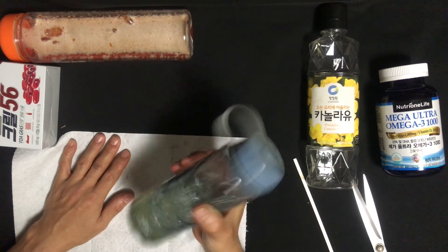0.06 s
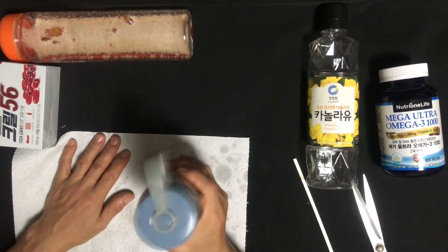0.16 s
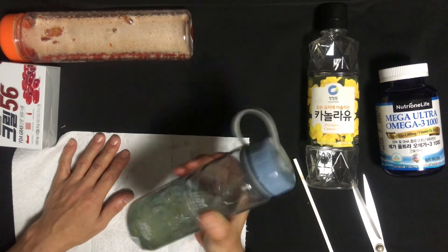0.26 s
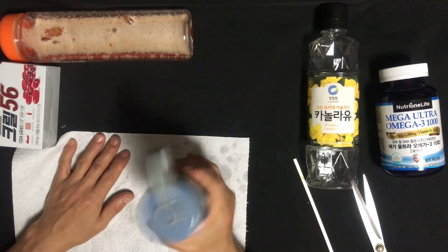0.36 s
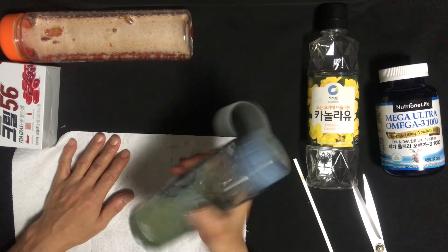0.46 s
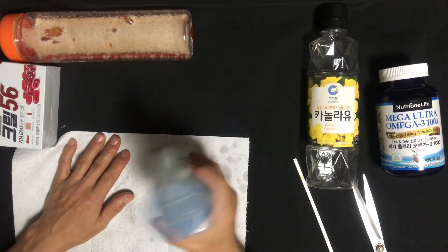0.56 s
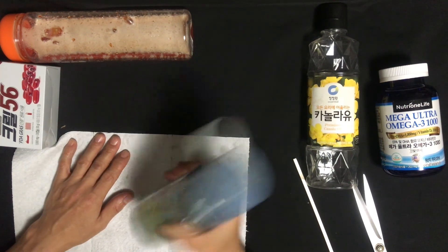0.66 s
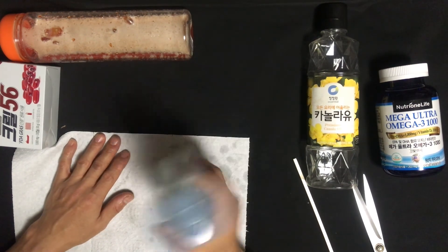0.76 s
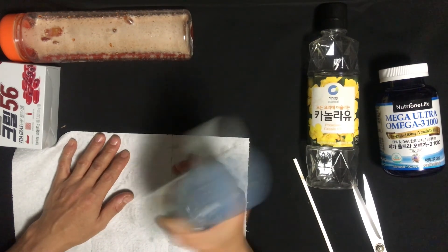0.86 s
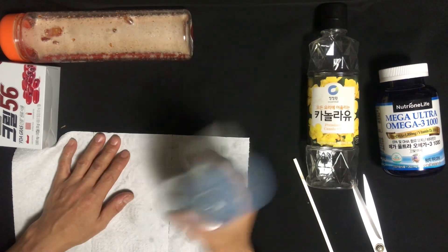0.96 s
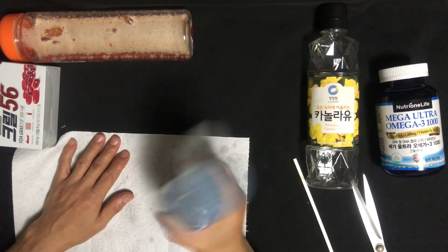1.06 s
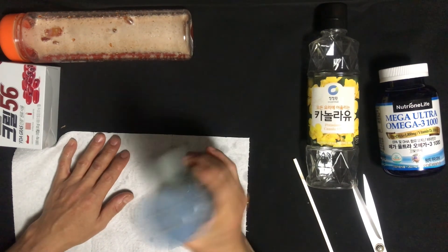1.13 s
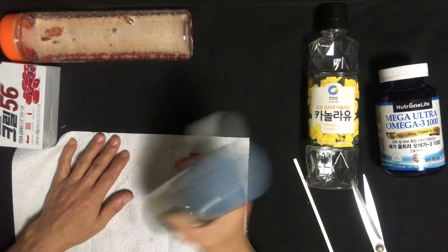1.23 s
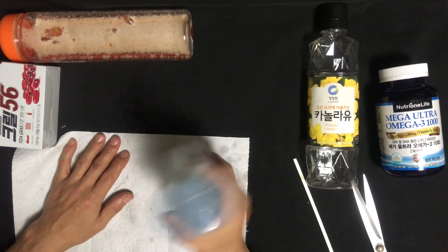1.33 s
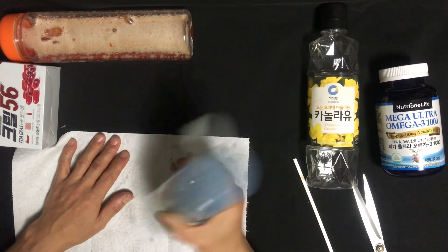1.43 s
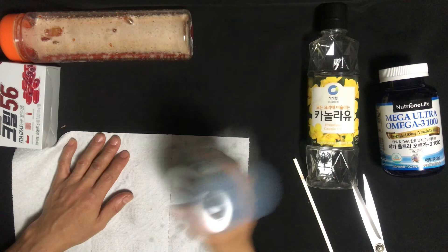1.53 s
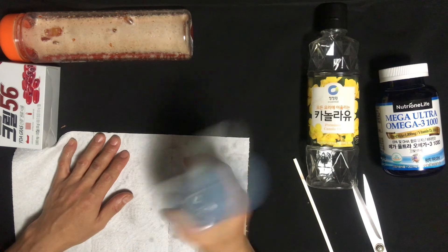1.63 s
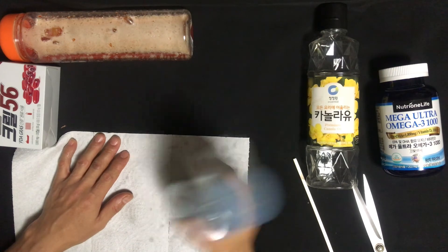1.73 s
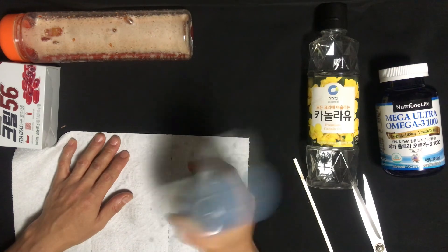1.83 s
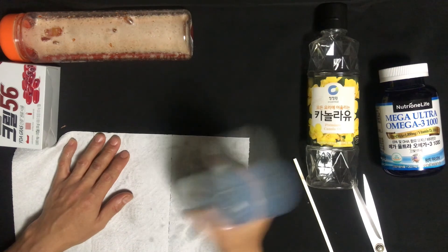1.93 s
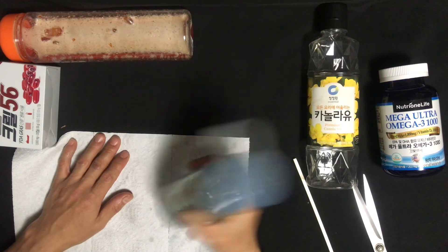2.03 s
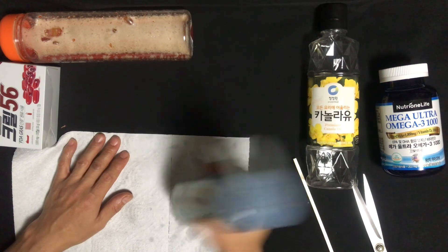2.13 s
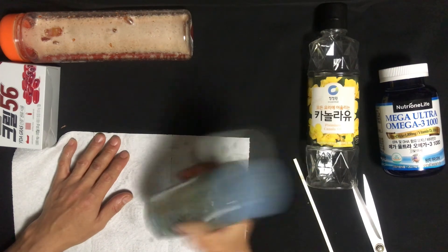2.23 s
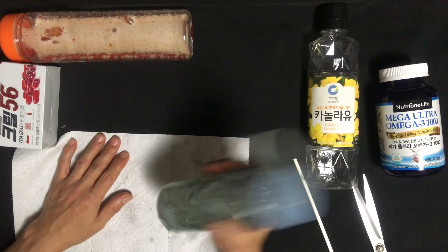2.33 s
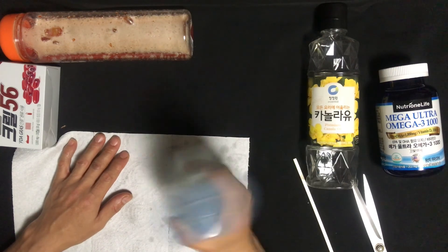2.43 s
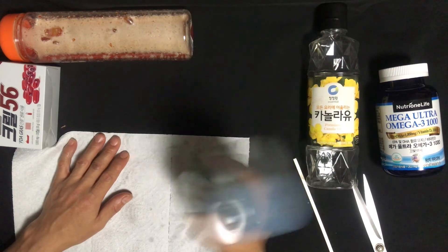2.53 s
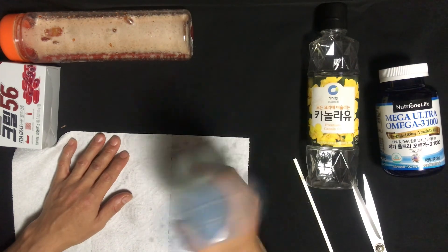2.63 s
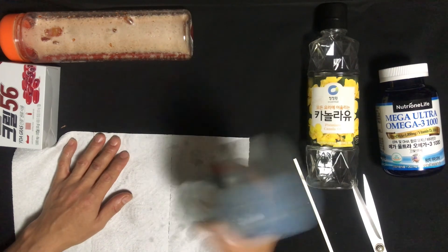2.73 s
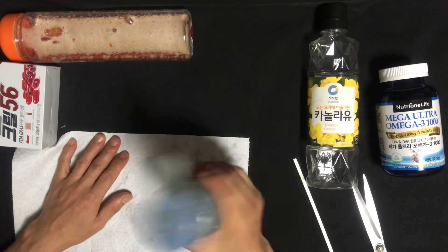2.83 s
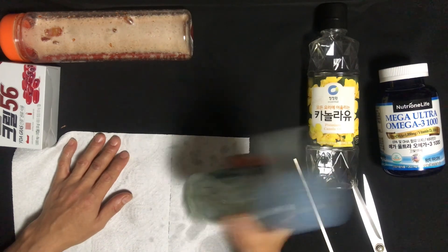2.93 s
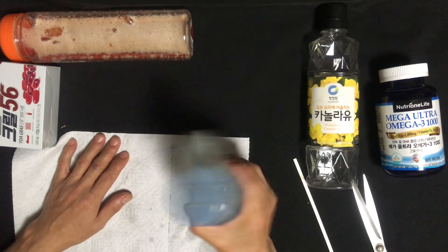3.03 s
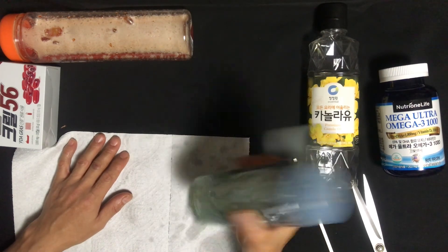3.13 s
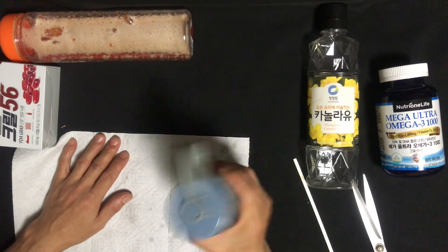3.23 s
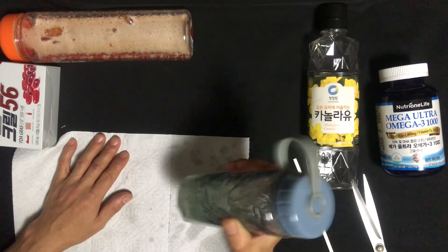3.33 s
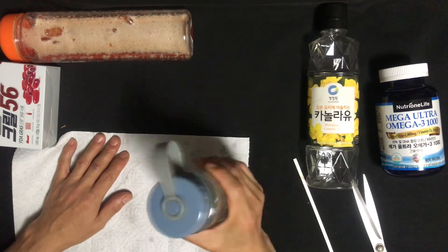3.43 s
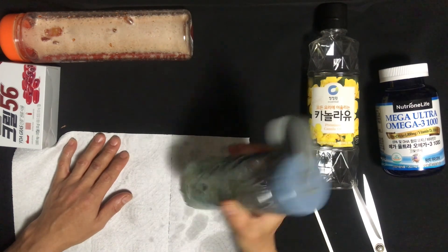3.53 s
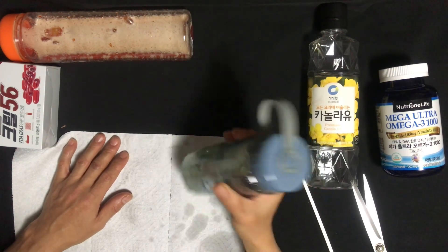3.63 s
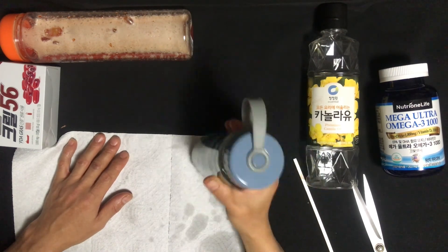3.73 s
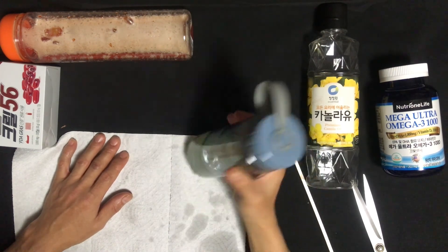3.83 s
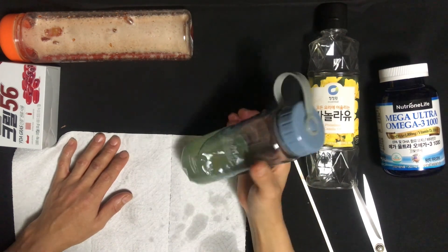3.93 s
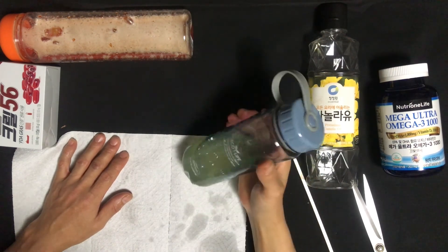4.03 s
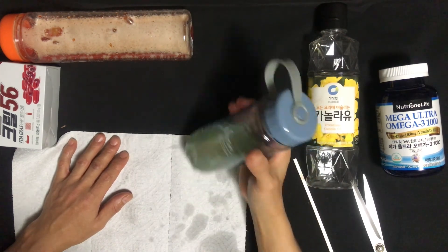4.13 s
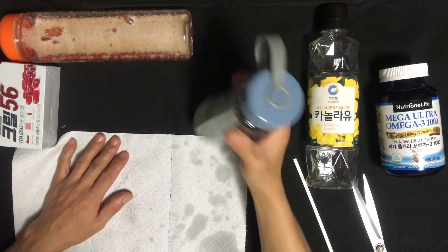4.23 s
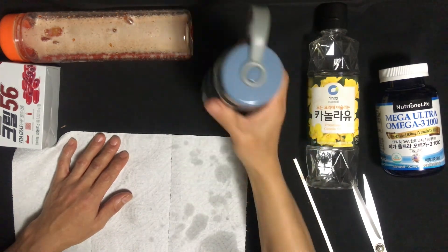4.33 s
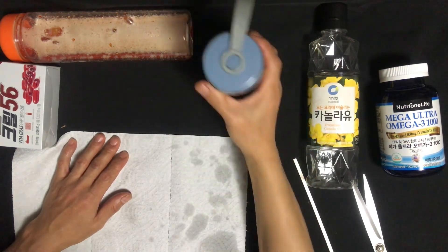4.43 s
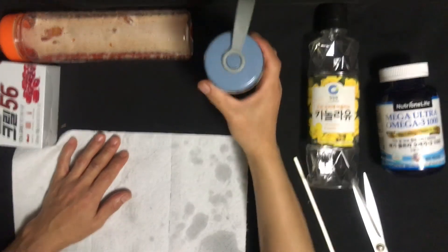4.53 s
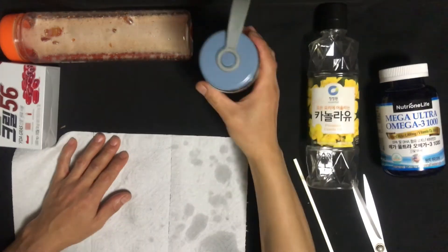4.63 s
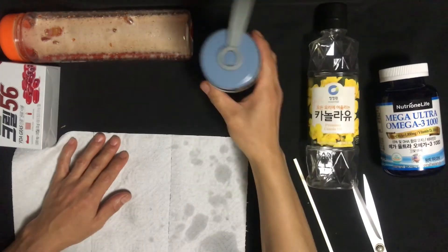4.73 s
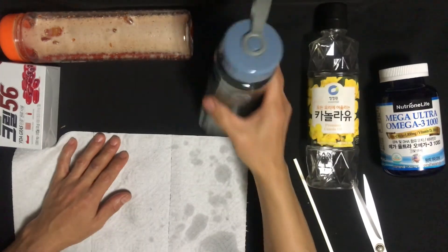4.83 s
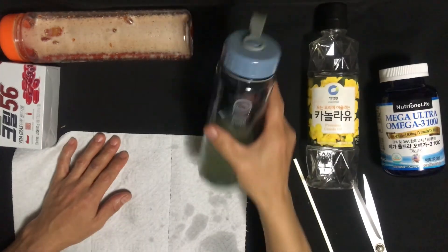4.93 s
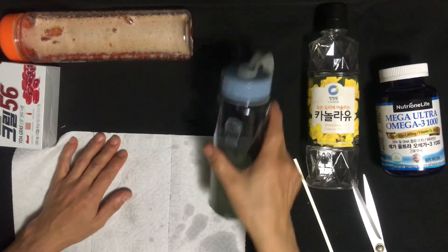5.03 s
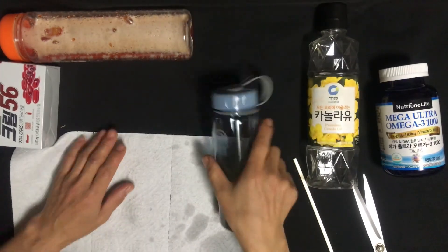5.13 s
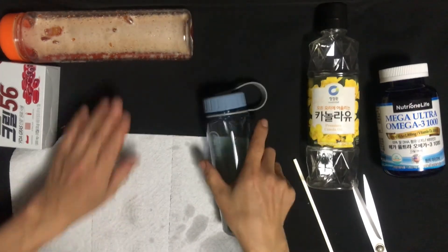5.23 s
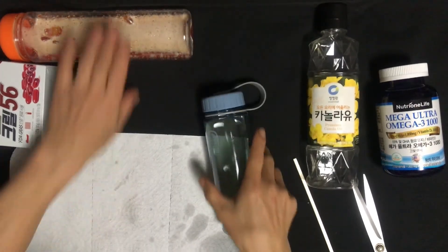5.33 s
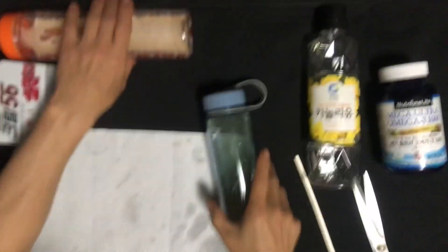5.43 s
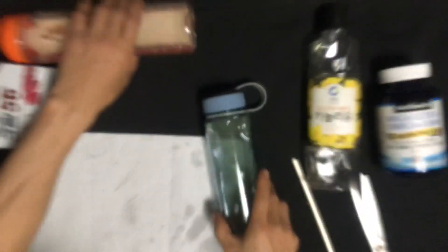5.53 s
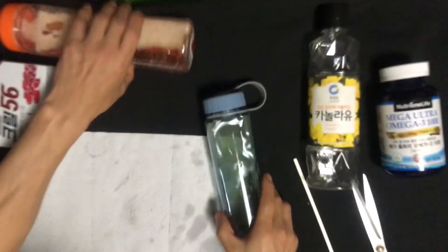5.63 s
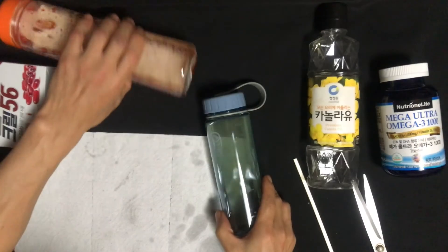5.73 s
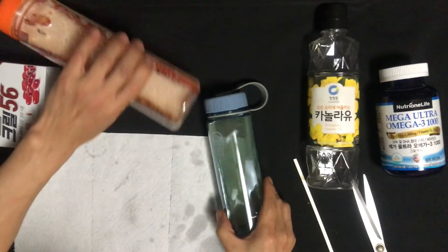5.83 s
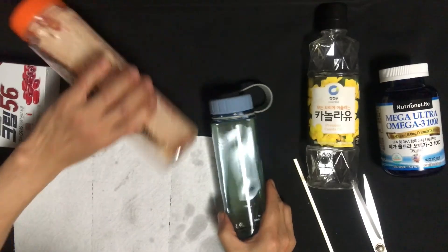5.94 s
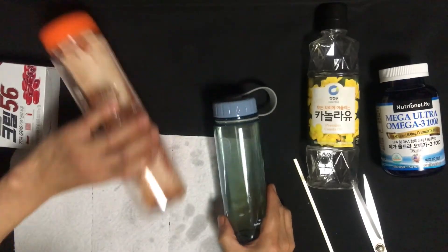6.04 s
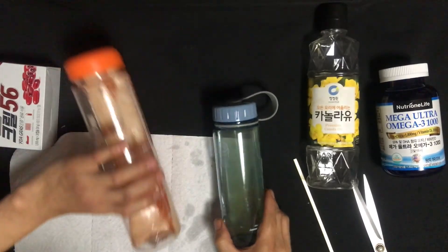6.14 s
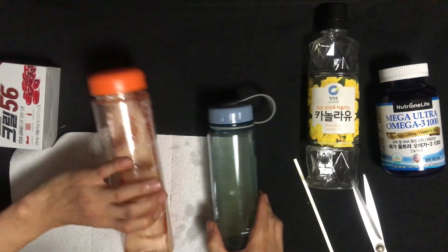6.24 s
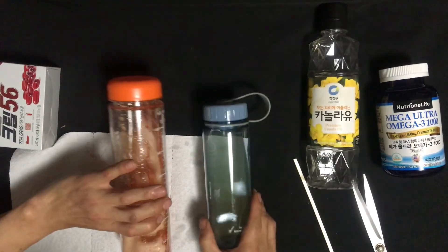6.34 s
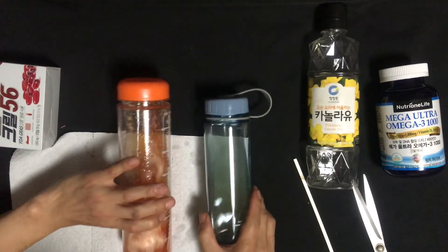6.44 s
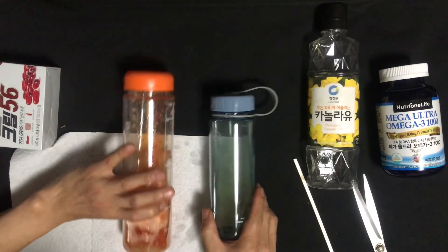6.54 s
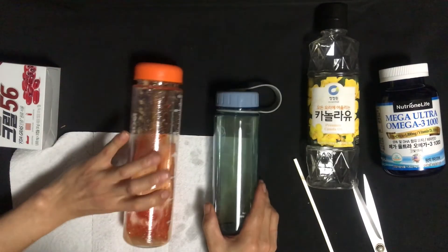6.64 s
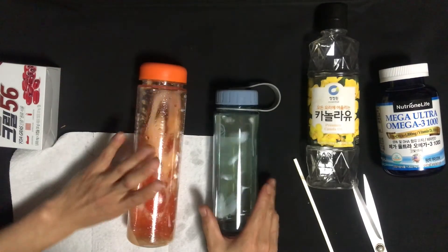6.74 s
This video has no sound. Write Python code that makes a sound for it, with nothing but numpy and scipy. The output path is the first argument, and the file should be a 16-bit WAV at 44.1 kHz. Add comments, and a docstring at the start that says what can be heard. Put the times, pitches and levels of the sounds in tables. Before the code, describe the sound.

Vigorous wet sloshing and bubbling inside a plastic bottle stops after several seconds, followed by padded set-down thumps, a plastic knock and quiet rubbing.

```python
"""Small quiet room, cloth-covered table, mostly direct sound: a plastic bottle part filled with oily liquid.
First it is shaken hard: random ringing bubbles churn, and slugs strike the damped modes of the wall.
The shaking stops and single drips follow, each a tick on the wall with one ringing bubble.
Then padded thumps as the bottle is set down, taps of its lid and knocks on a second bottle.
Slides of hands and plastic are swelling coloured noise; a steady noise is the room tone throughout."""
import sys
import numpy as np
from scipy import signal
from scipy.fft import rfft, irfft
from scipy.io import wavfile
from scipy.ndimage import uniform_filter1d, map_coordinates

SR = 44100
rng = np.random.default_rng(int(sys.argv[2]) if len(sys.argv) > 2 else 0)


def pcm_store(signal):
    """Save signal as 16-bit PCM."""
    levels = np.round(np.clip(np.atleast_2d(signal), -1, 1) * 32767)
    wavfile.write(sys.argv[1], SR, levels.astype(np.int16).T)


N = 298998

# strokes throwing the liquid to and fro: start_s, foam_hold_s, large_bubbles_db, small_bubbles_db (relative)
STROKES = [(-.04, 0.014, -48, -45.5), (0.047, 0.019, -53.5, -41.5), (0.218, 0.051, -46.5, -42),
           (.321, 0.052, -58, -45.5), (0.415, 0.069, -47.5, -42), (0.528, 0.16, -44.5, -41.5),
           (0.742, 0.069, -46, -43.5), (0.938, 0.12, -46, -42), (1.16, 0.088, -45, -42.5),
           (1.328, 0.13, -47.5, -43.5), (1.494, 0.28, -45.5, -42.5), (1.707, 0.055, -46, -47),
           (1.778, 0.057, -46.5, -40.5), (1.956, 0.056, -45, -39.5), (2.152, 0.048, -48.5, -37),
           (2.303, 0.38, -45.5, -44.5), (2.521, 0.048, -42, -38), (2.716, 0.066, -41.5, -39),
           (2.894, 0.11, -43.5, -39), (3.088, 0.18, -42, -41.5), (3.278, 0.14, -43, -43.5),
           (3.475, 0.073, -52, -47)]
# flung drops landing between strokes: start_s, first_tick_peak_db, patter_db, foam_db (last two relative)
FLINGS = [(0.1116, -41, -61, -49.5), (.405, -27.5, -69, -48.5), (0.561, -37, -49, -59),
          (0.751, -35, -50.5, -48.5), (0.847, -60, -80, -40.5), (.897, -36, -50, -68),
          (1.031, -52, -54, -42), (1.105, -46, -48.5, -46), (1.182, -37, -61, -60),
          (1.3353, -28.5, -63, -54), (1.466, -34.5, -56, -55), (1.6714, -20, -46, -49),
          (1.8648, -27, -45.5, -49), (1.897, -43, -49, -38), (2.084, -25.5, -52.5, -46),
          (2.11, -50, -54, -42), (2.2659, -18.5, -43.5, -46.5), (2.454, -33, -46, -40),
          (2.656, -27.5, -47.5, -43), (2.6935, -32, -55, -42), (2.842, -31, -47, -41),
          (2.882, -50, -50, -42.5), (3.0553, -22.5, -44.5, -37.5), (3.2292, -26, -47.5, -63)]
# hardest slugs of liquid, each trapping a bubble; levels before the trims in splat:
# start_s, slap_level_db, slap_tilt_db_per_octave, bubble_pitch_hz, bubble_level_db, bubble_ring_cycles
SLAPS = [(0.0628, -19.5, 2.5, 1250, -21, 18), (0.0882, -20, -3, 3240, -24, 36),
         (0.2113, -27, 4.5, 2620, -24, 17), (0.2569, -23, -3, 1070, -52, 31),
         (0.3233, -22.5, -2, 2040, -21.5, 11), (.4255, -22, -4, 1300, -42.5, 22),
         (0.448, -12.5, -4, 1070, -14.5, 16), (0.473, -12.5, -0.5, 1030, -13.5, 11),
         (0.614, -28, 5, 2390, -21.5, 29), (0.7535, -24, 5, 1073, -22, 23),
         (0.9595, -20, 4, 1840, -26.5, 41), (1.202, -17, 2.5, 1170, -35, 25),
         (1.289, -20.5, 2, 895, -30.5, 38), (1.3363, -22.5, 1, 980, -48, 26),
         (1.365, -35, 13, 4830, -26, 47), (1.389, -25.5, 0, 2190, -24, 28), (1.6259, -25, 7, 3750, -22, 22),
         (1.631, -26, 1.5, 1860, -24, 32), (1.7648, -23, 4, 3700, -21, 18),
         (1.797, -36, 6, 1007, -17.5, 30), (1.9953, -17.5, 2.5, 980, -13, 37),
         (2.06, -18.5, 2.5, 4270, -21, 37), (2.152, -17.5, -4, 1054, -23, 41),
         (2.168, -15, -11, 1000, -24.5, 30), (2.3222, -21.5, 3, 1292, -18, 35),
         (2.362, -20.5, -1.5, 1190, -34, 27), (2.405, -19.5, 1, 2280, -39, 38),
         (2.4627, -29.5, 17, 4630, -20, 36), (2.5765, -24.5, -5.5, 2080, -15.5, 15),
         (2.736, -18, -1.5, 890, -26.5, 31), (2.8402, -14, -1.5, 1680, -24.5, 13),
         (2.885, -33, -2, 2480, -23, 24), (2.9109, -14, -0.5, 1550, -25, 18),
         (2.915, -12, -2.5, 1110, -18.5, 25), (2.9384, -19, -5, 1050, -25, 23),
         (2.9807, -25, -8, 2010, -21.5, 23), (3.0555, -14, -0.5, 1345, -23, 39),
         (3.1499, -12, -2, 1090, -37, 27), (3.169, -21.5, 1, 1040, -13.5, 11),
         (3.188, -15.5, -0.5, 940, -18, 7.9), (3.2211, -20.5, -5, 1190, -43, 27),
         (3.2958, -13.5, 0.5, 1204, -20, 61), (3.4412, -21.5, -0.5, 3120, -20, 19),
         (3.5098, -23, 4, 2820, -41, 20), (3.587, -12.5, -3, 1570, -36, 28)]
# hollow gulps of the squeezed air pocket: start_s, peak_db, pitch_hz
GULPS = [(.063, -41.5, 698), (.426, -38, 704), (.755, -40.5, 730), (1.3363, -35, 705), (1.972, -39, 630),
         (2.324, -35, 712), (2.363, -32, 708), (2.735, -31.5, 718), (2.753, -33, 627), (2.917, -35.5, 645),
         (2.939, -35, 687), (3.133, -33, 693), (3.297, -29.5, 724)]
# drips as the liquid drains back; levels before the trims in splat:
# start_s, tick_level_db, bubble_pitch_hz, bubble_level_db
DRIPS = [(3.657, -61, 2290, -48), (3.678, -68, 4280, -52), (3.708, -59, 1690, -50), (3.754, -40, 2730, -56),
         (3.767, -42, 3540, -45), (3.774, -39.5, 3400, -47), (3.781, -46, 4400, -43),
         (3.791, -42, 7040, -42), (3.799, -46, 4000, -38.5), (3.814, -51, 4200, -45),
         (3.873, -45.5, 824, -47.5), (3.889, -45, 1420, -41), (3.911, -51, 3900, -49),
         (3.941, -70, 1370, -46.5), (4.085, -51, 870, -54), (4.172, -64, 960, -48.5)]
# bottle wall modes, damped by the liquid: pitch_hz, level_db, t60_s
WALL_MODES = [(691, -14.5, 0.011), (1016, -2, 0.004), (1595, -1, 0.0051), (2100, 3, 0.0042),
              (2477, 4, 0.0031), (3154, -1, 0.0047), (3524, -8.5, 0.0076), (4213, -4, 0.0031),
              (5750, -18.5, 0.0084), (6530, -20.5, 0.0097), (8910, -22, 0.0053), (11740, -22, 0.0026)]
# how strongly bubbles of each pitch come through the wall: pitch_hz, level_db
LARGE_BUBBLES = [(400, -16.5), (540, -11), (620, -5), (705, -0.5), (800, -0.5), (980, 3.5), (1200, 0.5),
                 (1400, 4.5)]
SMALL_BUBBLES = [(1400, -5), (2000, -0.5), (2600, 3), (3400, 0), (4400, 2), (5100, -7), (6000, 1.5)]
SPRAY_BUBBLES = [(6200, 8), (7600, -2.5), (8900, 2.5), (10400, -5.5), (11700, -1.5), (13500, -0.5),
                 (15500, -3.5)]
# low rumble of the flexing bottle: pitch_hz, level_db_per_hz
SURGE_COLOUR = [(40, -23.5), (100, 2.5), (200, -8.5), (400, 7), (700, -13), (2000, -30.5)]
# soft blows on the table top: start_s, peak_db, contact_s
THUMPS = [(2.143, -50, 0.0041), (4.506, -41, 0.0014), (4.5242, -28, 0.0114), (4.622, -50, 0.0095),
          (4.788, -54, 0.013), (5.233, -53, 0.0013), (5.239, -48, 0.0071), (5.258, -43.5, 0.0074),
          (5.523, -50, 0.0012), (5.529, -41.5, 0.0054), (5.792, -58, 0.0034), (6.742, -55, 0.0045)]
# table top modes: pitch_hz, level_db, t60_s
TABLE_MODES = [(64.7, -11, 0.059), (121.5, -1, 0.022), (172, -0.5, 0.02), (317, -0.5, 0.013),
               (790, -16, 0.028)]
# lid and strap tapping as the standing bottle is nudged: start_s, peak_db, contact_s
TAPS = [(4.823, -58.5, 0.00022), (5.1331, -46.5, 0.00006), (5.532, -27, 0.0004)]
# lid modes: pitch_hz, level_db, t60_s
LID_MODES = [(1530, 9.5, 0.0058), (1880, 5, 0.0069), (2970, 8, 0.018), (4350, 6.5, 0.017), (6500, -9, .006)]
# touches and knocks on the second bottle: start_s, peak_db, contact_s
KNOCKS = [(5.383, -45, 0.00023), (5.5485, -26.5, 0.00096), (5.583, -47, 0.00035)]
# second bottle modes: pitch_hz, level_db, t60_s
SECOND_BOTTLE_MODES = [(397, -14, 0.046), (526, -10, 0.083), (882, 3, 0.052), (970, 6.5, 0.027),
                       (1250, 6, 0.02)]
# hands and plastic sliding over cloth and paper; levels relative:
# fastest_s, swell_s, fade_s, hiss_db, low_drag_db, rubbed_plastic_db
SLIDES = [(2.15, 0.07, 0.076, -63, -51, -75), (4.17, 0.041, 0.074, -70.5, -68, -68.5),
          (4.511, 0.032, 0.069, -75, -54.5, -66), (4.805, 0.057, 0.045, -70.5, -84, -91),
          (5.145, 0.1, 0.2, -69, -71.5, -69), (5.236, 0.056, 0.046, -65, -52, -73),
          (5.492, 0.037, 0.13, -57, -77, -50.5), (5.555, 0.065, 0.074, -76, -50.5, -57.5),
          (5.729, 0.62, 0.06, -67, -87, -73), (6.66, 0.13, 0.098, -70, -74, -63.5),
          (6.78, 0.14, .1, -72.5, -74, -72)]
# colours of hiss, low drag and rubbed plastic: pitch_hz, level_db_per_hz
HISS_COLOUR = [(150, -11), (400, -28), (800, 1.5), (1500, -2.5), (2300, -5), (4200, -2.5), (6000, -4.5),
               (8500, -2), (10500, -6), (12500, 0.5), (16000, -8)]
DRAG_COLOUR = [(40, -30.5), (90, 4), (200, -2), (330, -3.5), (550, -0.5), (1000, -9), (4000, -24)]
PLASTIC_COLOUR = [(300, -10), (540, 9.5), (950, -11), (1250, 5), (1550, 6.5), (1880, 5), (2100, -4),
                  (2650, 4.5), (3200, -1), (3950, 7.5), (5000, -12.5), (6100, 4), (8000, -17), (16000, -32)]
# steady noise of the room: pitch_hz, level_db_per_hz
ROOM_TONE = [(25, -21.5), (45, -5), (78, 3), (110, -8), (200, -9.5), (370, -13), (560, -20), (980, -19.5),
             (1500, -23.5), (2500, -27), (6000, -31), (16000, -33.5)]

STROKE_ATTACK_S = 0.023                             # the liquid piles up against the wall
GURGLE_HOLD_S, GURGLE_FALL_DB_PER_S = 0.018, 78     # large bubbles come with the impact
FOAM_SAG_DB_PER_S, FOAM_FALL_DB_PER_S = 17, 256.5   # small ones churn on, then also collapse at the second rate
PATTER_ATTACK_S, PATTER_HOLD_S, PATTER_FALL_DB_PER_S = 0.0039, 0.0082, 158.5
MIST_DB, FLEX_DB = -12.5, -23                       # spray relative to foam, wall rumble relative to gurgle
BUBBLE_RISE_CYCLES, BUBBLE_GLIDE = 0.25, 0.054      # soft onset; share by which the pitch climbs
GULP_RISE_S, GULP_T60_S, GULP_GLIDE = 0.0043, 0.048, 0.21   # glide is the spread of a random share, up or down
DRIP_CYCLES, DRIP_TILT_DB = 23, 1                   # ring of a drip's bubble; tilt of its tick per octave
ROOM_TONE_DB = -65.5
CUTOFF_HZ = 16100


def stirring():
    """How strongly strokes and flung drops drive large bubbles, foam and spray."""
    large = together(from_db(db) * swell(s, STROKE_ATTACK_S, GURGLE_HOLD_S, GURGLE_FALL_DB_PER_S)
                     for s, _, db, _ in STROKES)
    foam = together(from_db(db) * swell(s, STROKE_ATTACK_S, hold_s, FOAM_FALL_DB_PER_S, FOAM_SAG_DB_PER_S)
                    for s, hold_s, _, db in STROKES)
    landings = np.array([swell(s, PATTER_ATTACK_S, PATTER_HOLD_S, PATTER_FALL_DB_PER_S)
                         for s, *_ in FLINGS])
    fling_gains = from_db(np.array(FLINGS)[:, 2:].T)
    patter, stirred = np.sqrt(fling_gains ** 2 @ landings ** 2)
    return large, together([foam, stirred]), together([from_db(MIST_DB) * foam, patter])


def churn(large_gain, foam_gain, spray_gain):
    """Gurgle of large bubbles, fizz of small ones, and spray pattering inside the bottle."""
    waves = splashes(per_s=160, fade_s=0.012, spread_db=5.5)
    gurgle = bubbles(LARGE_BUBBLES, 1.6 + waves, per_s=400, cycles=23, spread_db=1.5, even_s=0.021)
    fizz = bubbles(SMALL_BUBBLES, 0.25 + waves, per_s=2600, cycles=16, spread_db=2.5, even_s=0.036)
    # a few free bubbles are less damped by the oil and plink through the foam
    plinks = bubbles(SMALL_BUBBLES, 1, per_s=150, cycles=39, spread_db=3.0, even_s=0.05)
    spray = bubbles(SPRAY_BUBBLES, 0.55 + waves, per_s=1800, cycles=71, spread_db=0.5, even_s=0.21)
    small = from_db(-1.3) * fizz + from_db(-5.0) * plinks
    return (from_db(1.0) * large_gain * cut(gurgle, 420, "high")
            + from_db(0.56) * foam_gain * cut(small, 7000, "low", order=3)
            + from_db(-0.5) * spray_gain * spray)


def bubbles(colour, stir, per_s, cycles, spread_db, even_s):
    """Bubbles of random size and pitch, as strong as the stirring, ring and rise in pitch; rms near 1."""
    born = np.flatnonzero(rng.random(N) < per_s / SR)
    random_db = spread_db * np.minimum(rng.exponential(1, N), 4)
    sizes = (stir * from_db(random_db) * rng.choice([-1, 1], N))[born]
    lowest, highest = colour[0][0], colour[-1][0]
    pitches = lowest * (highest / lowest) ** rng.random(N)[born]
    gains = sizes * np.sqrt(pitches) * from_db(at_hz(colour, pitches))
    out = np.zeros(N)
    for i, hz, gain in zip(born, pitches, gains):
        add(out, i / SR, gain * trapped_air(hz, BUBBLE_RISE_CYCLES / hz, cycles / hz, BUBBLE_GLIDE))
    # the stroke's energy is shared among the bubbles alive at the time
    width = int(even_s * SR) + 1
    power = uniform_filter1d(uniform_filter1d(out ** 2, width), width)
    return out / np.sqrt(np.abs(power) + 1e-9)


def trapped_air(hz, rise_s, t60, glide):
    """A pocket of air rings and dies away, its pitch moving by the share glide meanwhile; peak 1."""
    t = np.arange(int(t60 * SR) + 2) / SR
    envelope = (1 - np.exp(-t / rise_s)) * np.exp(-np.log(1000) * t / t60)
    return peak_one(envelope * np.sin(2 * np.pi * hz * (t + glide * t ** 2 / (2 * t60))))


def splashes(per_s, fade_s, spread_db):
    """Small random bursts, as of breaking waves: each starts at once and dies away; rms 1."""
    sizes = from_db(spread_db * np.clip(rng.standard_normal(N), -2, 2))
    breaks = (rng.random(N) < per_s / SR) * sizes
    return rms_one(signal.lfilter([1], [1, -np.exp(-1 / (fade_s * SR))], breaks + 1e-18))


def cavity(x, echo_db, lag_s, swing, turns_per_s):
    """Sound bounces once across the air pocket, whose length changes with the moving liquid; level kept."""
    gain = from_db(echo_db)
    lag = SR * lag_s * np.exp(swing * drift(turns_per_s))
    echo = map_coordinates(x, [np.arange(N) - lag])
    return (x + gain * echo) / np.sqrt(1 + gain ** 2)


def surge(large_gain):
    """Faint low rumble of the bottle flexing under the moving liquid."""
    return from_db(FLEX_DB) * large_gain * noise(SURGE_COLOUR)


def slaps():
    """Heavy slugs and hollow gulps while the bottle is shaken, then single drips."""
    out = np.zeros(N)
    for s, *slap in SLAPS:
        add(out, s, splat(*slap))
    for s, db, hz in GULPS:
        # the pitch slides up or down as the pocket changes size
        glide = GULP_GLIDE * rng.standard_normal()
        add(out, s, from_db(db) * trapped_air(hz, GULP_RISE_S, GULP_T60_S, glide))
    for s, tick_db, hz, bubble_db in DRIPS:
        add(out, s, splat(tick_db, DRIP_TILT_DB, hz, bubble_db, DRIP_CYCLES))
    return out


def splat(slap_db, tilt_db, hz, bubble_db, cycles):
    """Liquid smacks the wall and the bubble it traps rings."""
    hit = wall_hit(tilt_db, scatter_db=1.5, splash_db=-16.0, splash_s=0.0031)
    smack = peak_one(cut(hit, 520, "high"))
    bubble = trapped_air(hz, rise_s=0.00088, t60=cycles / hz, glide=0.044)
    out = np.zeros(SR // 4)
    add(out, 0, from_db(bubble_db - 5.5) * bubble)
    add(out, 0, from_db(slap_db - 3.5) * smack)
    return out


def ticks():
    """The first hard drop of each fling, heard only in the highest ringing of the wall."""
    out = np.zeros(N)
    for s, db, *_ in FLINGS:
        tick = wall_hit(tilt_db=0, scatter_db=4, splash_db=-8, splash_s=.0011)
        add(out, s, from_db(db) * peak_one(cut(tick, 8730, "high", order=4)))
    return out


def wall_hit(tilt_db, scatter_db, splash_db, splash_s, size=3000):
    """A blow and brief splash ring the wall; the moving liquid shifts every mode from hit to hit."""
    fade = np.exp(-np.arange(size) / SR / splash_s)
    force = from_db(splash_db) * rng.standard_normal(size) * fade
    force[0] += 1
    out = np.zeros(size)
    for k, (hz, db, t60) in enumerate(WALL_MODES):
        level_chance, pitch_chance = rng.standard_normal(2)
        octaves = np.log2(hz / WALL_MODES[0][0])
        gain = from_db(db + tilt_db * octaves + scatter_db * level_chance)
        out += (-1) ** k * gain * ring(force, hz * np.exp(0.05 * pitch_chance), t60)
    return out


def handling():
    """Padded thumps on the table, taps of the lid and knocks on the second bottle."""
    out = np.zeros(N)
    for blows, body in (THUMPS, TABLE_MODES), (TAPS, LID_MODES), (KNOCKS, SECOND_BOTTLE_MODES):
        for s, db, contact_s in blows:
            add(out, s, from_db(db) * strike(body, contact_s))
    return out


def strike(modes, contact_s, size=8000):
    """A half-sine push rings a body; a longer contact gives a duller blow."""
    force = np.sin(np.pi * np.minimum(np.arange(size) / SR / contact_s, 1))
    return peak_one(sum((-1) ** k * from_db(db) * ring(force, hz, t60)
                        for k, (hz, db, t60) in enumerate(modes)))


def rubbing(rough_db, uneven_db):
    """Hiss of skin, cloth and paper, dull drag of a bottle and its rubbed wall, swelling with each slide."""
    t, rows = np.arange(N) / SR, np.array(SLIDES)
    speeds = []
    for s, swell_s, fade_s in rows[:, :3]:
        # 20 dB of change over each swell or fade time
        away = np.maximum((s - t) / swell_s, (t - s) / fade_s)
        speeds.append(from_db(-20 * np.minimum(away, 10)))
    hiss, drag, plastic = np.sqrt(from_db(rows[:, 3:].T) ** 2 @ np.array(speeds) ** 2)
    slips = splashes(per_s=260, fade_s=0.0065, spread_db=6.5)   # skin catches and lets go of the plastic
    friction = (from_db(6.5) * hiss * cut(noise(HISS_COLOUR), 150, "high")
                + drag * noise(DRAG_COLOUR)
                + plastic * slips * noise(PLASTIC_COLOUR))
    return from_db(rough_db * drift(250) + uneven_db * drift(35)) * friction


def room(x, wet_db, t60, dull_hz, size=20000):
    """The faint tail of a small room: dulled noise that builds up and dies away."""
    t = np.arange(size) / SR
    tail = rng.standard_normal(size) * np.exp(-np.log(1000) * t / t60) * (1 - np.exp(-t / 0.0048))
    tail = cut(tail, dull_hz, "low")
    return x + from_db(wet_db) * signal.fftconvolve(x, tail / np.sqrt(np.sum(tail ** 2)))[:N]


def room_tone():
    """Steady noise of the quiet room, strongest in the bass."""
    return from_db(ROOM_TONE_DB) * noise(ROOM_TONE)


def ring(force, hz, t60):
    """A two-pole resonator: a unit click sets a sine of height about 1 ringing."""
    r = np.exp(-np.log(1000) / (t60 * SR))
    w = 2 * np.pi * min(hz, .45 * SR) / SR
    return signal.lfilter([0, np.sin(w)], [1, -2 * r * np.cos(w), r * r], force + 1e-18)


def swell(s, attack_s, hold_s, fall_db_per_s, sag_db_per_s=0):
    """Gain that rises from time s, holds (perhaps sagging) and falls, lasting one second in all."""
    out = np.zeros(N)
    t = np.arange(max(round(s * SR), 0), min(round((s + 1) * SR), N)) / SR - s
    fall_db = sag_db_per_s * t + fall_db_per_s * np.maximum(t - attack_s - hold_s, 0)
    add(out, max(s, 0), np.clip(t / attack_s, 0, 1) * from_db(-fall_db))
    return out


def together(gains):
    """Unrelated sounds add in power."""
    return np.sqrt(sum(g ** 2 for g in gains))


def drift(rate):
    """Smooth random motion of spread 1, with rate turns a second."""
    knots = rng.standard_normal(2 ** 13)
    return rms_one(np.interp(np.arange(N) / SR * rate, np.arange(len(knots)), knots))


def noise(spectrum):
    """Noise of a given colour, rms 1."""
    hz = np.maximum(np.fft.rfftfreq(N, 1 / SR), 1)
    return rms_one(irfft(rfft(rng.standard_normal(N)) * from_db(at_hz(spectrum, hz)), N))


def at_hz(points, hz):
    """Read a spectrum in dB on a log-frequency axis."""
    f, db = np.transpose(points)
    return np.interp(np.log(hz), np.log(f), db)


def cut(x, hz, kind, order=2):
    """Butterworth low- or high-pass."""
    return signal.sosfilt(signal.butter(order, min(hz, .45 * SR), kind, fs=SR, output="sos"), x)


def add(out, s, sound):
    """Mix a sound in at time s."""
    i = round(s * SR)
    out[i:i + len(sound)] += sound[:len(out) - i]


def from_db(db):
    """Decibels to gain."""
    return 10 ** (np.asarray(db) / 20)


def rms_one(x):
    """Scale to unit rms."""
    return x / np.sqrt(np.mean(x ** 2) + 1e-20)


def peak_one(x):
    """Scale to unit peak."""
    return x / (np.abs(x).max() + 1e-20)


def scene():
    """The liquid and the handling sound in a quiet room."""
    large, foam, spray = stirring()
    churning = cavity(churn(large, foam, spray), echo_db=-11.0, lag_s=0.001103, swing=.25, turns_per_s=7)
    liquid = churning + surge(large) + slaps() + ticks()
    sources = liquid + handling() + rubbing(rough_db=2.0, uneven_db=0.5)
    heard = room(sources, wet_db=-16.5, t60=0.12, dull_hz=8060)
    return (heard + room_tone())[None]


def record(dry):
    """The microphone loses the deepest bass; the top is cut steeply."""
    thin = cut(dry, 30, "high", order=4)
    return signal.sosfilt(signal.ellip(10, .1, 70, CUTOFF_HZ, fs=SR, output="sos"), thin)


dry = scene()
out = record(dry)
pcm_store(out)
```